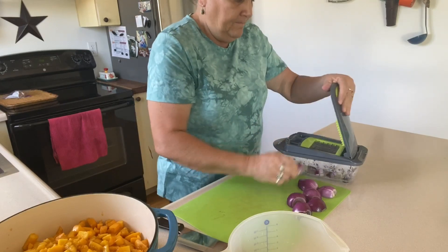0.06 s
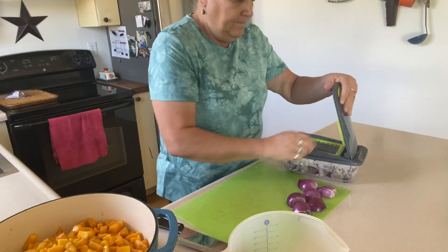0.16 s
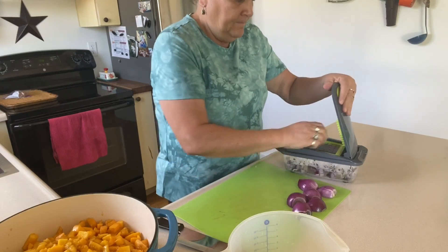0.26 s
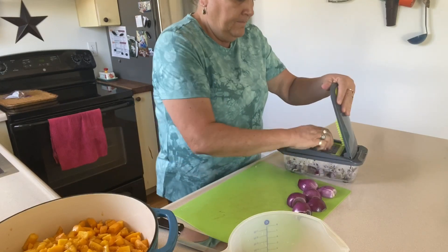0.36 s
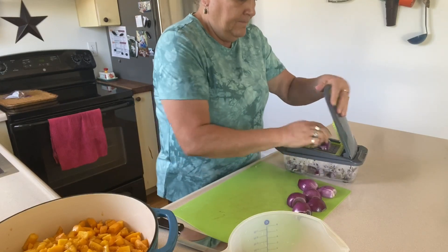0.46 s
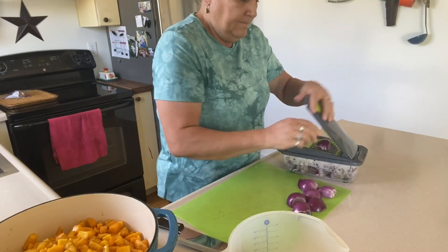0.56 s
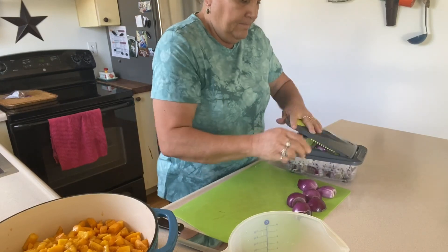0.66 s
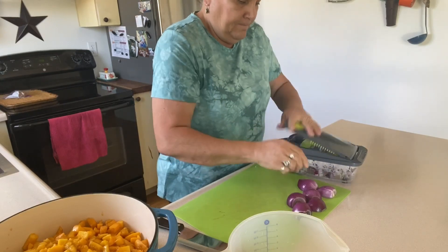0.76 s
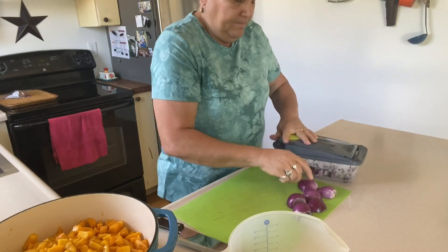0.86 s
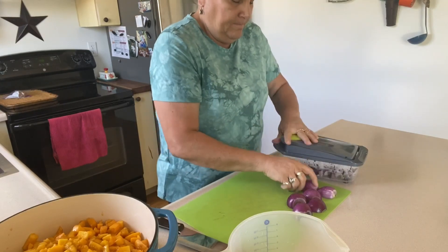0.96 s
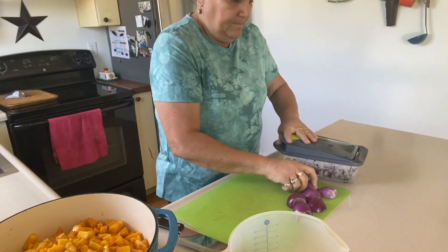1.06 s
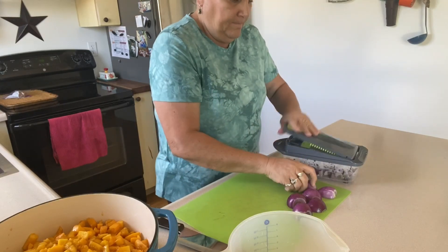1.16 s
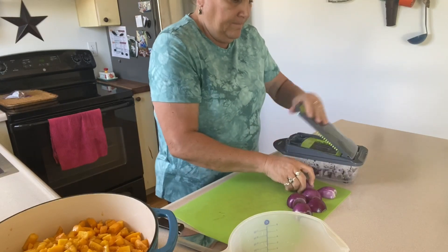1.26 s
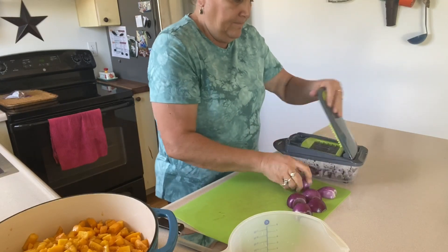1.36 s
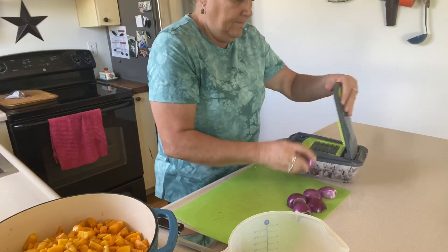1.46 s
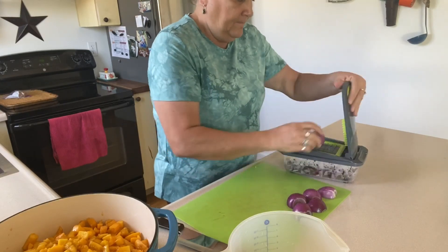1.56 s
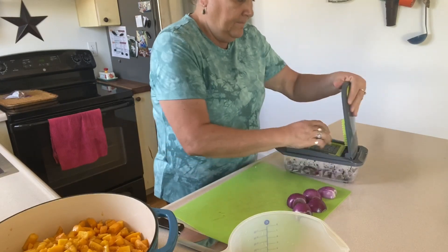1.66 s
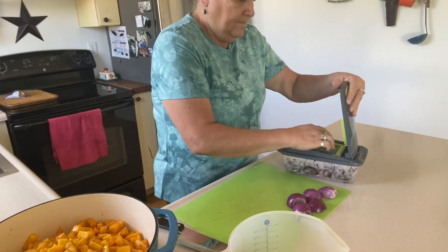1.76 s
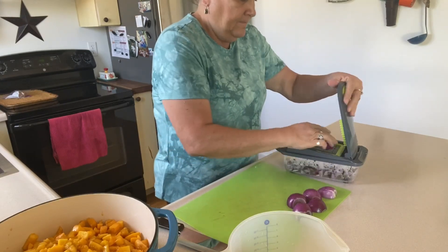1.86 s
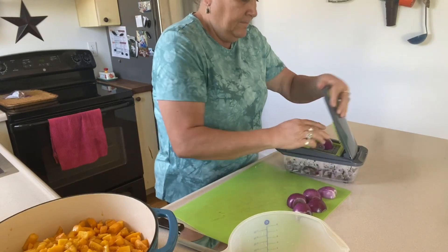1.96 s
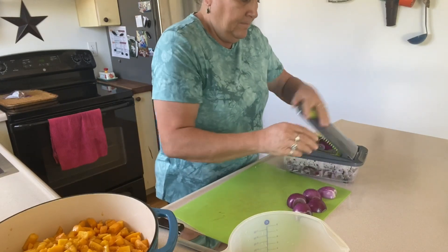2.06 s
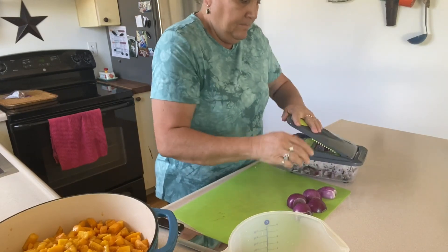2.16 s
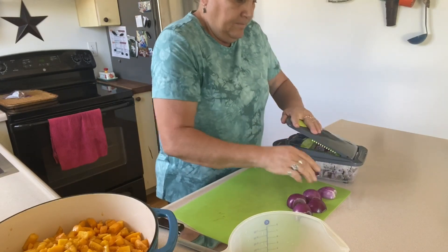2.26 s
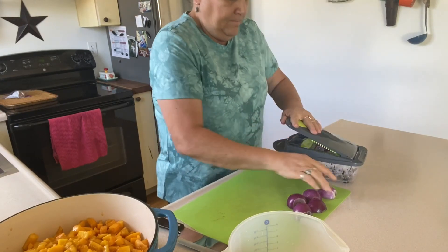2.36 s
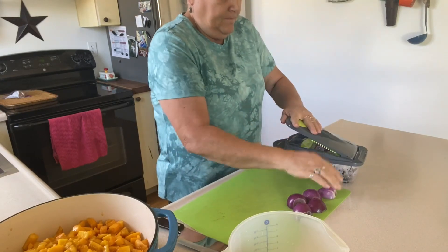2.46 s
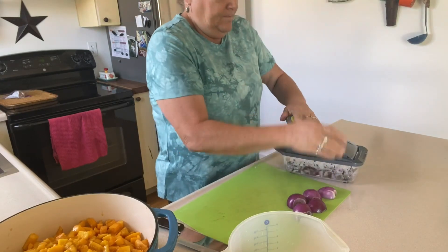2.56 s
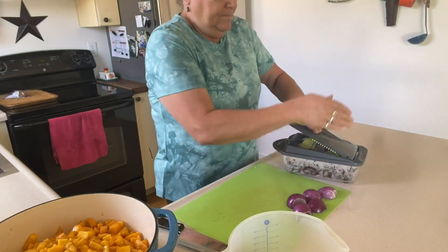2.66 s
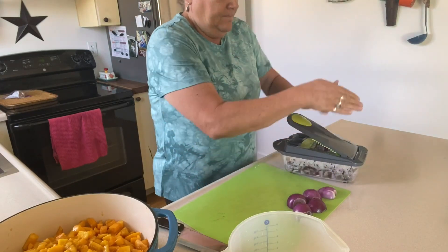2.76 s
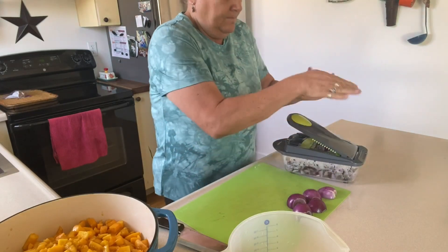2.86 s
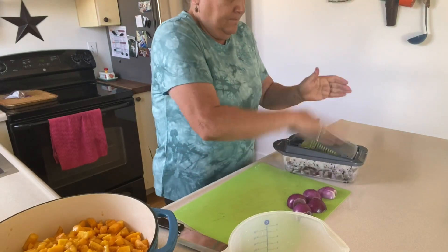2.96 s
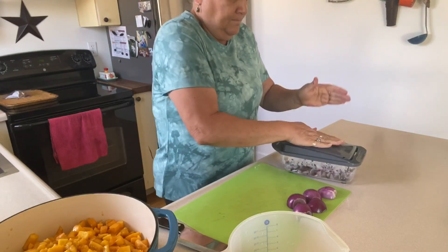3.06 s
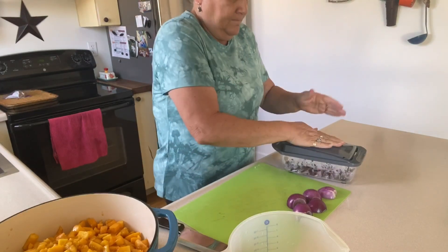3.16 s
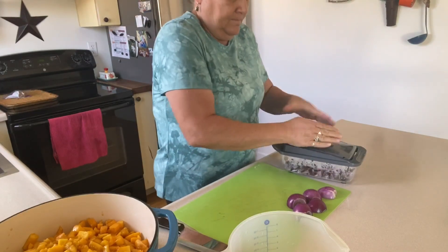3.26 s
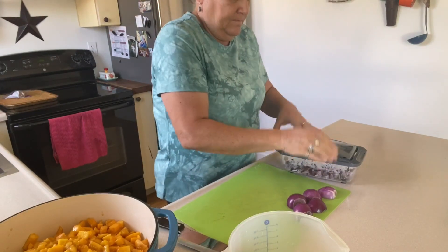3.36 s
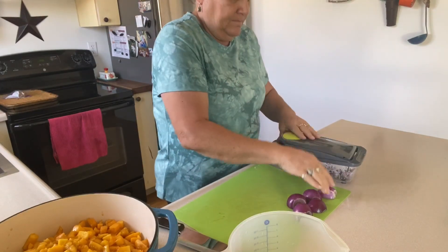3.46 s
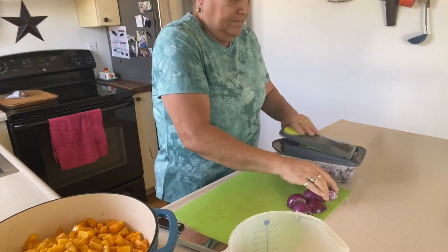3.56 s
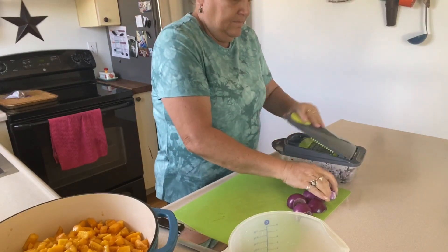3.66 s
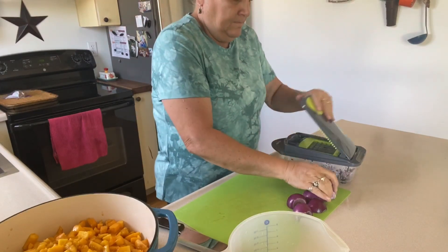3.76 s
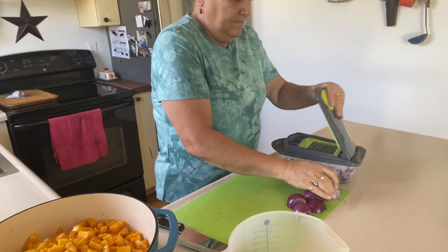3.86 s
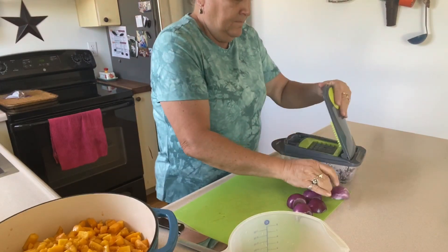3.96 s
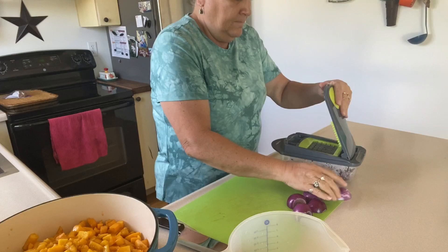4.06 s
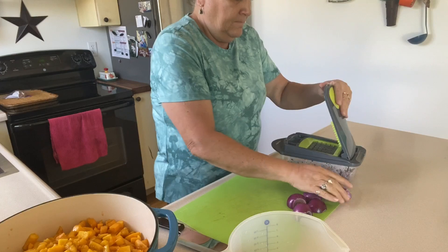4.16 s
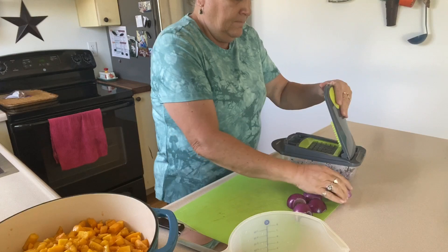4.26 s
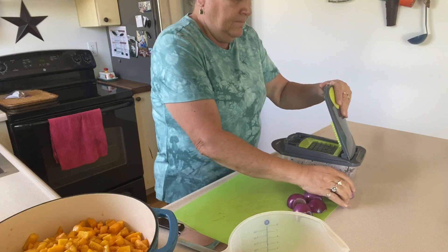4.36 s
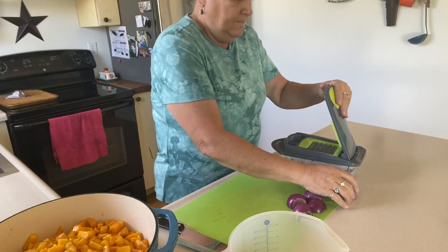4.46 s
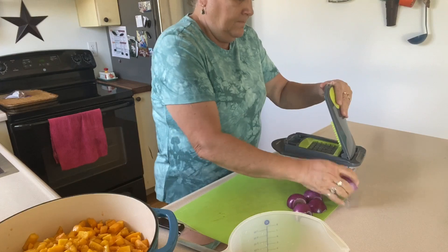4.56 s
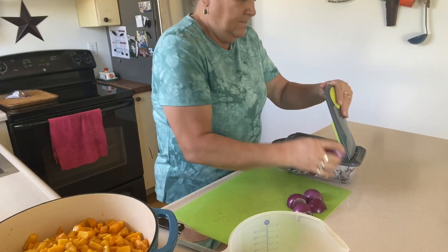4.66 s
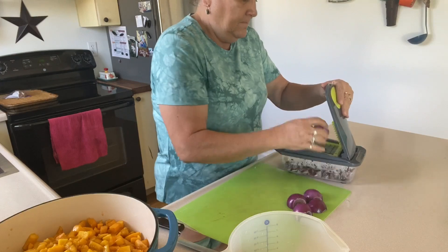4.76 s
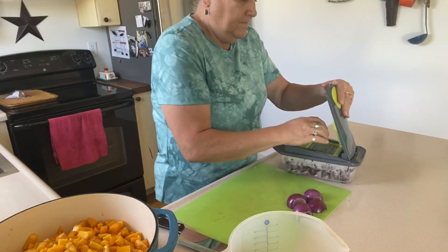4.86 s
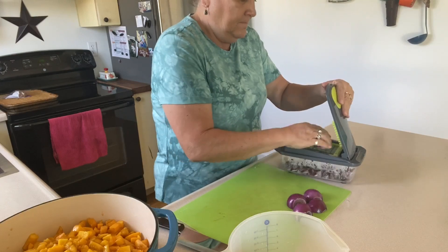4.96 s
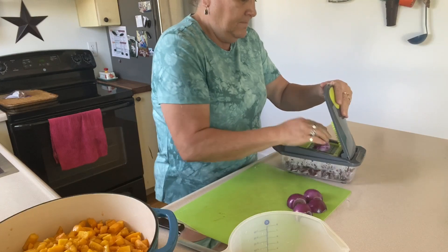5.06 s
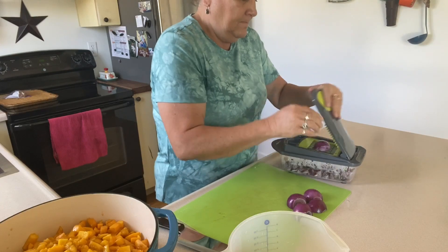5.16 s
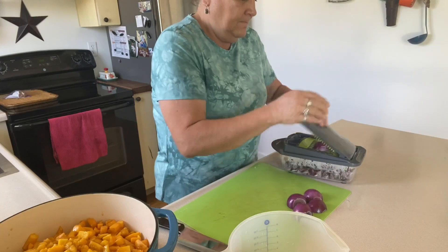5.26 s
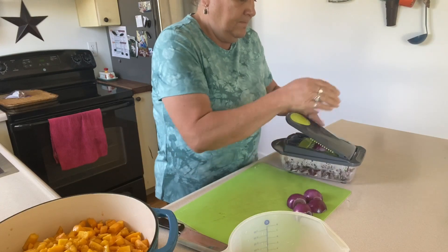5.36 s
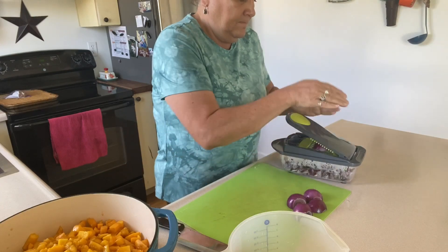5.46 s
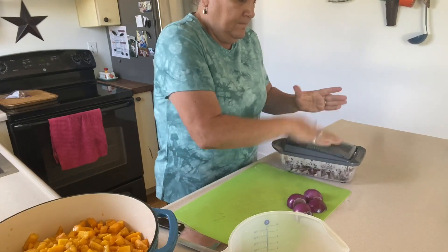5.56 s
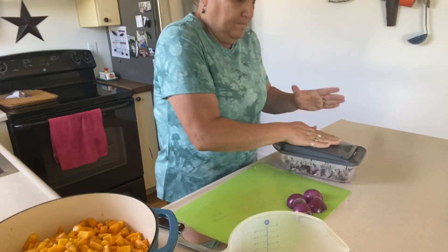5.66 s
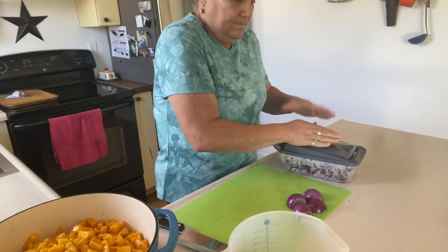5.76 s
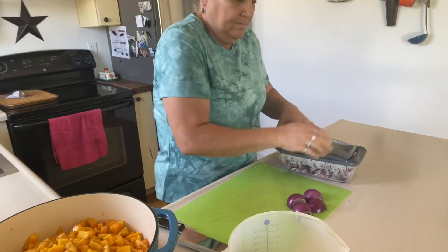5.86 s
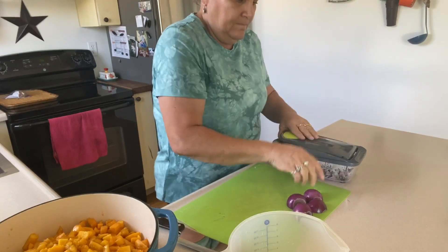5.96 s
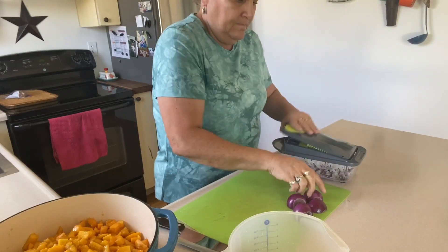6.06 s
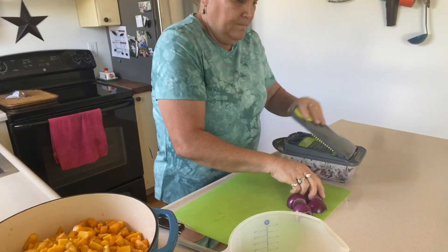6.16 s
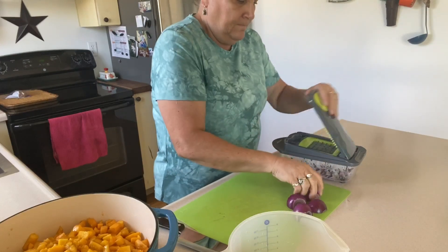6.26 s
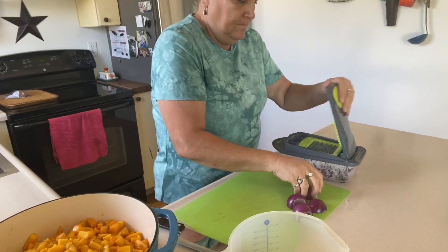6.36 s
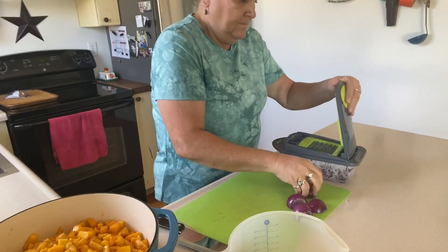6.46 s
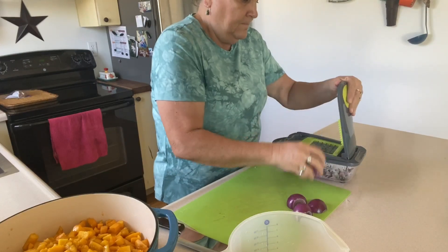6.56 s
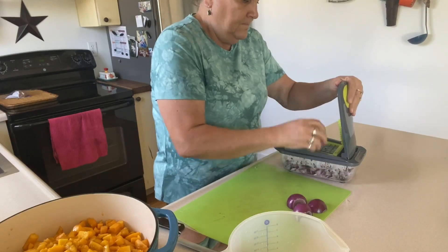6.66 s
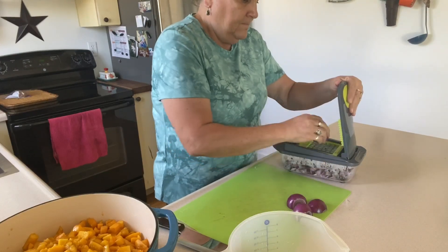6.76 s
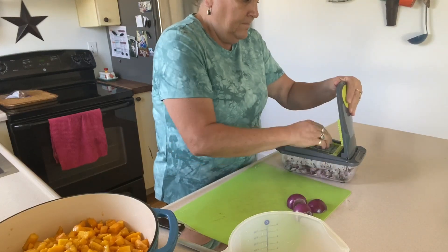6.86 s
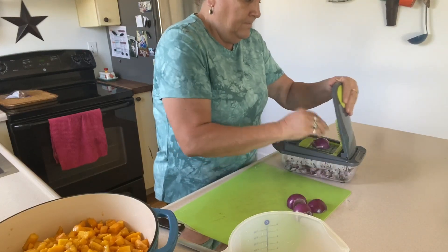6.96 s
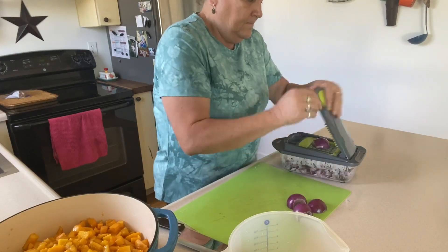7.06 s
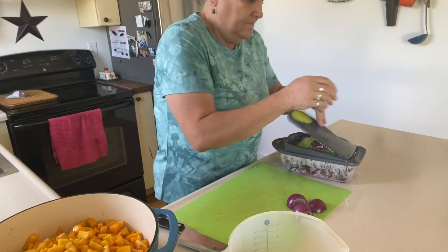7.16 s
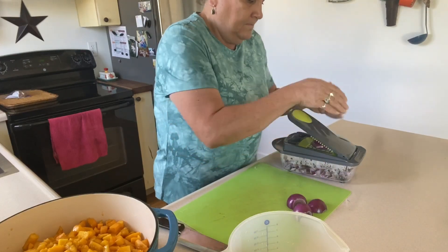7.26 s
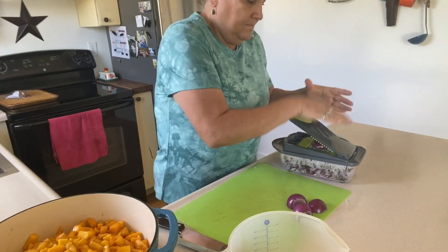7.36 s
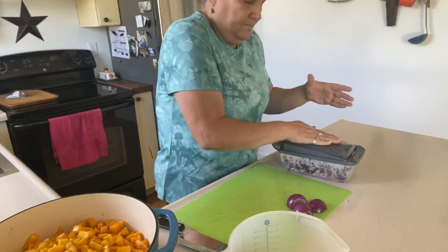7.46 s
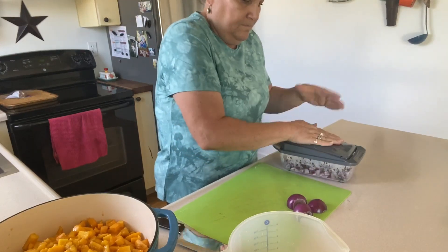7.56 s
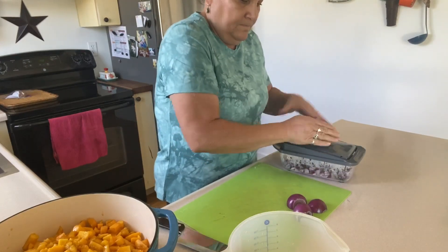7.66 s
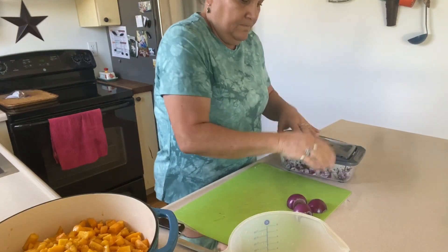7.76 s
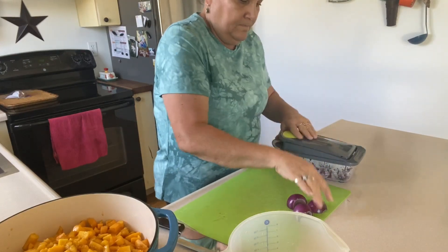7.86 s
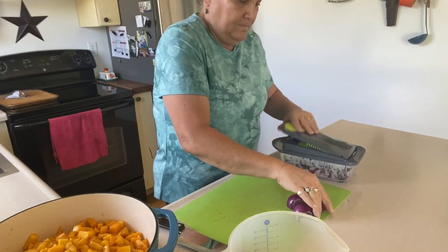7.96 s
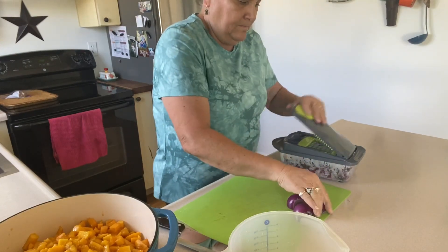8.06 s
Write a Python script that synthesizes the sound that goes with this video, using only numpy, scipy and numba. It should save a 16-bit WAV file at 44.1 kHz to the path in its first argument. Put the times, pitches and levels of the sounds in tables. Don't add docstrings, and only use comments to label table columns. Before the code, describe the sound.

A plastic push-down chopper lid slams four times through onion with hard hollow cracks and counter thumps, light knocks between, in an echoing kitchen.

```python
import sys
import numpy as np
from scipy import signal
from scipy.fft import rfft, irfft, next_fast_len
from scipy.io import wavfile
from scipy.ndimage import uniform_filter1d
from numba import njit

SR = 44100
rng = np.random.default_rng(int(sys.argv[2]) if len(sys.argv) > 2 else 0)


def decibels_to_gain(level_db):
    exponent = np.asarray(level_db, float) / 20
    return 10 ** exponent


def generate_wav(sig):
    pcm = np.round(np.clip(np.atleast_2d(sig).T, -1, 1) * 32767).astype(np.int16)
    wavfile.write(sys.argv[1], SR, pcm)


N = 357651

# pitch_hz, level_db per Hz
HUM_COLOUR = [(22, -7.5), (50, 2), (90, -9), (200, -12.5), (450, -18.5), (1000, -31), (6500, -51.5),
              (14000, -71.5)]
# pitch_hz, width_hz, level_db
FRIDGE_MOTOR = [(55.4, 11, -60), (124, 41, -64.5), (850, 170, -75)]
# pitch_hz, t60_s
ROOM_T60 = [(60, 0.29), (200, 0.61), (1000, 0.55), (1900, 0.61), (3000, 0.52), (5000, 0.54), (9500, 0.38),
            (16000, 0.25)]
# pitch_hz, level_db
ROOM_COLOUR = [(60, -6.5), (220, 1.5), (1100, 1.5), (2000, 1.5), (2900, 2.5), (5000, -2.5), (10000, -4.5),
               (16000, -1.5)]
# left_s, right_s, level_db
REFLECTIONS = [(.00007, 0, 0), (.0011, .0006, -7), (.0027, .0036, -9), (.0061, .0049, -11)]
# pitch_hz, difference_db
LOW_PAN = [(60, -1.2), (125, -.8), (280, -6), (400, -6), (520, 3.5)]
# pitch_hz, level_db
OVERALL_TONE = [(100, 0), (11500, 0), (11900, -28), (13850, -32), (14050, 2), (15200, 1), (16000, -12),
                (16600, -50)]
# pitch_hz, level_db per Hz
CRACK_COLOUR = [(350, -11.5), (600, -4), (1500, -10), (3900, -11.5), (6500, -12.5), (11000, -13),
                (15000, -23), (17000, -19.5)]
# pitch_hz, level_db, width_hz
LID_PLATES = [(874.4, 19, 37), (1090, -6.5, 130), (1420, 9, 550), (1600, -3.5, 67), (1894, -5.5, 43),
              (2160, -7, 110), (2300, -2.5, 75)]
# pitch_hz, level_db, t60_s
SHUT_LID_MODES = [(910, -2, .09), (1415, -3.5, .07), (1568, 2.5, 0.24), (1960, -8.5, .08), (2142, 0, .12),
                  (2168, -9, 0.023), (2622, -0.5, .07), (3216, -6, .06), (4800, -3.5, 0.18)]
# pitch_hz, level_db, t60_s
BLADE_FRAME = [(2720, -21, 0.026), (3154, -4, 0.054), (4170, -14, 0.013), (4330, -1, 0.075),
               (5280, -11.5, 0.013)]
# pitch_ratio, level_db, decay_share
BOX_MODES = [(.84, -4, .9), (1, 0, 1), (1.06, -3, .8), (1.17, -5, .7), (1.38, -12, .6), (1.9, -9, .8),
             (2.25, -11, .6)]
# pitch_hz, level_db, t60_s
COUNTER_MODES = [(70, 0, 0.4), (118, -5, 0.05), (148, -8, 0.07), (256, -14, 0.033)]
# pitch_hz, level_db, t60_s
THUD_MODES = [(70.7, -4, 0.27), (93.4, -2.5, 0.12), (114.6, 1, 0.13), (161.7, 1, 0.11), (200, -2, 0.076),
              (246, -2, 0.074)]
# start_s, level_db
TICKS = [(0.6406, -35.5), (0.7179, -52.5), (0.739, -41.5), (2.1984, -44), (2.2964, -60), (2.3209, -51),
         (2.368, -51.5), (2.8374, -63), (2.958, -23), (3.395, -55.5), (3.456, -72), (3.5294, -63),
         (7.3741, -49)]
# start_s, crack_db, shell_db, box_db, thump_db
OPEN_TAPS = [
    (0.3482, -37.5, -46.5, -35, -43),
    (3.9658, -46.5, -48.5, -57, -47.5),
    (4.9666, -35, -47, -39, -46),
    (5.2773, -37, -34, -35, -29.5),
    (6.8439, -38, -53, -42, -40.5),
    (7.1542, -38, -31, -32, -29.5),
]
# start_s, crack_db, shell_db, box_db, thump_db
SHUT_TAPS = [
    (1.5325, -87, -61.5, -64, -64.5),
    (1.7502, -42, -61.5, -52, -45),
    (2.1604, -47.5, -43, -52, -29.5),
    (2.5145, -49.5, -36, -58, -51.5),
    (6.2892, -53.5, -74, -60, -63),
]
# start_s, crack_db, box_db, box_hz, thud_db
NUDGES = [
    (0.612, -34, -34, 357, -28.5),
    (0.624, -37, -26.5, 385, -41.5),
    (0.6902, -46.5, -40.5, 373.7, -42.5),
    (2.0758, -35.5, -34.5, 502, -29),
    (2.0924, -38.5, -33, 387.5, -40),
]
# start_s, end_s, start_db, end_db
CUTS = [
    (0.613, .714, -48.5, -62),
    (0.711, .764, -63, -43),
    (0.765, .781, -35, -15),
    (2.087, 2.158, -44.5, -84.5),
    (2.194, 2.42, -67, -71),
    (2.937, 2.973, -44, -24.5),
    (5.519, 5.542, -42, -44),
    (5.547, 5.562, -23, -20),
    (7.359, 7.396, -46.5, -34.5),
    (7.395, 7.408, -33, -20.5),
]
# start_s, box_db, box_hz, thud_db, length_s
PRESSES = [
    (0.746, -18, 403.4, -16, 0.032),
    (2.951, -13, 393.2, -7.5, 0.007),
    (5.528, -23, 385, -28, 0.019),
    (7.362, -27, 370.7, -30, 0.045),
    (7.391, -22.5, 476.5, -39.5, 0.006),
]
# start_s, crack_db, shell_db, body_db (box and thud), lean_hz (loudest plates)
SLAMS = [
    (.780, -3.5, -14, -5.5, 2300),
    (2.974, -2.5, -14.5, -9.5, 1600),
    (5.561, -4.5, -13.5, -8, 4000),
    (7.406, -4.5, -12.5, -8.5, 1939),
]

OPEN_BOX_HZ, SHUT_BOX_HZ = 470, 385
LIGHT_LEAN_HZ = 4500


def unit(x):
    return x / np.sqrt(np.mean(x ** 2))


def on_log(points, hz):
    f, v = np.transpose(points)
    return np.interp(np.log(np.maximum(hz, 1)), np.log(f), v)


def shaped(x, gain):
    n = next_fast_len(x.shape[-1])
    hz = np.arange(n // 2 + 1) * SR / n
    return irfft(rfft(x, n) * gain(hz), n)[..., :x.shape[-1]]


def convolve(x, kernel):
    return signal.fftconvolve(x, kernel, axes=-1)[..., :N]


def add(out, start_s, x):
    i = int(start_s * SR)
    out[i:i + len(x)] += x[:len(out) - i]


def stereo_noise(size, alike_hz):
    mid, side = rng.standard_normal((2, size))
    side = shaped(side, lambda hz: np.clip(hz / alike_hz, 0, 1) ** 0.7)
    return np.array([mid + side, mid - side])


def hum():
    air = unit(shaped(stereo_noise(N, 520), lambda hz: decibels_to_gain(on_log(HUM_COLOUR, hz)))) * decibels_to_gain(-57)

    def motor_bands(hz):
        total = 0
        for centre_hz, width_hz, db in FRIDGE_MOTOR:
            resonance = 1 / (1 + (2 * (hz - centre_hz) / width_hz) ** 2)
            total = total + decibels_to_gain(db) * np.sqrt(2 * SR / (np.pi * width_hz)) * resonance
        return total

    motor = shaped(stereo_noise(N, 600), motor_bands)
    drift_db = unit(shaped(rng.standard_normal(N), lambda hz: (hz > 0) * (hz < 2.5)))
    return (air + motor) * decibels_to_gain(drift_db)


def kitchen(x):
    t, noise, tail = np.arange(SR) / SR, stereo_noise(SR, 600), 0
    for hz in 40 * 2 ** np.arange(0, 9, .5):
        band = shaped(noise, lambda f: np.clip(1 - 2 * np.abs(np.log2((f + 1) / hz)), 0, 1))
        tail = tail + band * decibels_to_gain(on_log(ROOM_COLOUR, hz) - 60 * t / on_log(ROOM_T60, hz))
    build_up = 1 - np.exp(-t / 0.0067)
    return convolve(x[None], tail * build_up * decibels_to_gain(-33))


def near_reflections(x):
    paths = np.zeros((2, 600))
    for left_s, right_s, db in REFLECTIONS:
        paths[[0, 1], [int(left_s * SR), int(right_s * SR)]] += decibels_to_gain(db)
    return convolve(x[None], paths)


def low_stereo(low):
    halves = np.array([[.5], [-.5]])
    return shaped(np.array([low, low]), lambda hz: decibels_to_gain(on_log(LOW_PAN, hz) * halves))


def crack_colour(hz):
    return decibels_to_gain(on_log(CRACK_COLOUR, hz))


def plate_colour(hz):
    power = sum(decibels_to_gain(2 * db) / (1 + (2 * (hz - f) / width) ** 2) for f, db, width in LID_PLATES)
    return np.sqrt(power)


def burst(size, gain, t60, rise_s, grain_db=0.):
    t = np.arange(size) / SR
    grains = np.repeat(decibels_to_gain(grain_db * rng.standard_normal(size // 64 + 1)), 64)[:size]
    grains = uniform_filter1d(grains, size=16)
    spray = unit(shaped(rng.standard_normal(size) * grains, gain))
    return spray * decibels_to_gain(-60 * t / t60) * (1 - np.exp(-t / rise_s))


def ring(modes, swell_s, size, spread_db=0.5, detune=0.023):
    t = np.arange(size) / SR
    hz, db, t60 = np.transpose(modes)[:, :, None]
    level_luck, pitch_luck = rng.standard_normal((2, len(modes), 1))
    tones = np.sin(2 * np.pi * hz * (1 + detune * pitch_luck) * t)
    y = (decibels_to_gain(db + spread_db * level_luck) * tones * decibels_to_gain(-60 * t / t60)).sum(0)
    y = y * (1 - np.exp(-(t / swell_s) ** 2))
    return y / np.abs(y).max()


def blows(table, base, crack_t60, rattle_db, rattle_t60, shell_t60, box_t60, box_swell_s, base_swell_s,
          send_db, plates_db):
    bright, low, send = np.zeros((3, N))
    size, short = SR // 2, SR // 4
    pulse, window = 1. * (np.arange(4096) == 256), np.hanning(512)
    for start_s, crack_db, shell_db, box_db, box_hz, thump_db, lean_hz in table:
        lean = lambda hz: decibels_to_gain(4.4 * np.exp(-np.log2((hz + 1) / lean_hz) ** 2 / 0.24))
        hard = lambda hz: lean(hz) * crack_colour(hz)
        plates = lambda hz: lean(hz) * plate_colour(hz)

        crack = burst(short, hard, crack_t60, .0012)
        rattle = burst(short, hard, rattle_t60, 0.0053, grain_db=5.5)
        blades = ring(BLADE_FRAME, 0.0008, short, spread_db=4, detune=0.05)
        add(bright, start_s, decibels_to_gain(crack_db) * (crack + decibels_to_gain(rattle_db) * rattle + decibels_to_gain(-10) * blades))
        add(bright, start_s, decibels_to_gain(shell_db) * burst(short, plates, shell_t60, 0.002, grain_db=2))

        for colour, db in ((hard, crack_db + send_db), (plates, shell_db + plates_db)):
            snap = unit(shaped(pulse, colour)[:len(window)] * window)
            add(send, start_s - .004, decibels_to_gain(db) * snap)

        box = [(ratio * box_hz, db, share * box_t60) for ratio, db, share in BOX_MODES]
        add(low, start_s, decibels_to_gain(box_db + 4) * ring(box, box_swell_s, size))
        add(low, start_s, decibels_to_gain(thump_db - 4) * ring(base, base_swell_s, size))
    return np.array([bright, low, send])


def ticks():
    out = np.zeros(N)
    colour = lambda hz: np.exp(-np.log2((hz + 1) / 8800) ** 2 / 1.3)
    for start_s, db in TICKS:
        add(out, start_s, decibels_to_gain(db + 2.5) * burst(2048, colour, 0.015, .001))
    return out


def taps():
    knocks = []
    for table, box_hz in ((OPEN_TAPS, OPEN_BOX_HZ), (SHUT_TAPS, SHUT_BOX_HZ)):
        for start_s, crack, shell, box, thump in table:
            knocks.append((start_s, crack, shell, box, box_hz, thump, LIGHT_LEAN_HZ))
    return blows(knocks, COUNTER_MODES, crack_t60=0.028, rattle_db=-15, rattle_t60=0.18, shell_t60=0.0096,
                 box_t60=.09, box_swell_s=0.0052, base_swell_s=0.0033, send_db=-13, plates_db=-17)


def nudges():
    shifts = [(start_s, crack, crack - 7.5, box, box_hz, thud, LIGHT_LEAN_HZ)
              for start_s, crack, box, box_hz, thud in NUDGES]
    return blows(shifts, THUD_MODES[1:], crack_t60=0.022, rattle_db=-6.5, rattle_t60=0.11, shell_t60=0.02,
                 box_t60=0.071, box_swell_s=0.0023, base_swell_s=0.025, send_db=-13, plates_db=-14)


def shearing():
    t, gain = np.arange(N) / SR, np.zeros(N)
    for start_s, end_s, start_db, end_db in CUTS:
        attack = np.clip((t - start_s) / .007, 0, 1) ** 2
        gain += decibels_to_gain(np.interp(t, [start_s, end_s], [start_db, end_db])) * attack * (t < end_s)
    clicks = (rng.random(N) < .05) * decibels_to_gain(2.5 * rng.exponential(size=N))
    cells = rng.standard_normal(N) * (0.31 + clicks)
    cells = shaped(cells, lambda hz: decibels_to_gain(on_log(CRACK_COLOUR, hz) + 0.5 * np.log2(1 + hz / 2000)))
    return unit(cells) * uniform_filter1d(gain, size=90) * decibels_to_gain(-1)


def presses():
    out, size = np.zeros(N), SR // 4
    t = np.arange(size) / SR
    for start_s, box_db, box_hz, thud_db, length_s in PRESSES:
        swell_s = min(.22 * length_s, 0.0096)
        hold = np.exp(-np.maximum(t - length_s, 0) / 0.0047)
        box = [(box_hz, 0, .3), (0.75 * box_hz, -12, .1), (1.3 * box_hz, -12, .1), (2.35 * box_hz, -17, .06)]
        add(out, start_s, decibels_to_gain(box_db) * ring(box, swell_s, size) * hold)
        add(out, start_s, decibels_to_gain(thud_db) * ring(THUD_MODES[1:], 0.02, size))
    return out


def shut_lid():
    out = np.zeros(N)
    for start_s, _, shell_db, *_ in SLAMS:
        modes = ring(SHUT_LID_MODES, 0.00072, SR // 4, spread_db=2.5, detune=0.005)
        add(out, start_s, decibels_to_gain(shell_db - 6) * modes)
    return out


def slams():
    hits = [(start_s, crack, shell, body - 6, SHUT_BOX_HZ, body, lean_hz)
            for start_s, crack, shell, body, lean_hz in SLAMS]
    return blows(hits, THUD_MODES, crack_t60=0.015, rattle_db=-18, rattle_t60=0.07, shell_t60=0.045,
                 box_t60=0.11, box_swell_s=0.0012, base_swell_s=0.0032, send_db=-8.5, plates_db=-9.5)


def scene():
    bright, low, send = taps() + nudges() + slams()
    wet = shearing() + ticks()
    low = low + presses()
    lid = shut_lid()
    echo = kitchen(send + wet + decibels_to_gain(4.5) * lid + decibels_to_gain(-5) * low)
    return near_reflections(bright + wet + lid) + low_stereo(low) + echo + hum()


@njit
def duck(over_db, attack, release):
    out, loss = np.empty(len(over_db)), 0.
    for i in range(len(over_db)):
        loss += (over_db[i] - loss) * (attack if over_db[i] > loss else release)
        out[i] = loss
    return out


def top_cut(x):
    return signal.sosfilt(signal.butter(12, 16990, fs=SR, output="sos"), x)


def record(dry):
    x = shaped(dry, lambda hz: decibels_to_gain(on_log(OVERALL_TONE, hz)))
    x = signal.sosfilt(signal.butter(3, 52, "high", fs=SR, output="sos"), x)
    level_db = 10 * np.log10(uniform_filter1d(np.mean(x ** 2, 0), size=882) + 1e-12)
    over_db = .9 * np.maximum(level_db + 35, 0)
    loss_db = duck(over_db, 1 / (.08 * SR), 1 / (0.048 * SR))
    mix = np.tanh(1.516 * x * decibels_to_gain(-loss_db)) / 0.71
    return top_cut(mix)


dry = scene()
out = record(dry)
generate_wav(out)
```